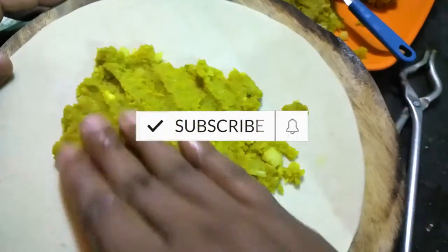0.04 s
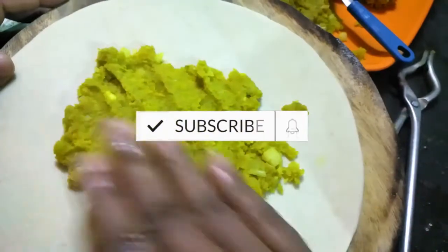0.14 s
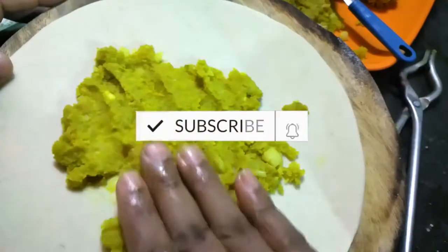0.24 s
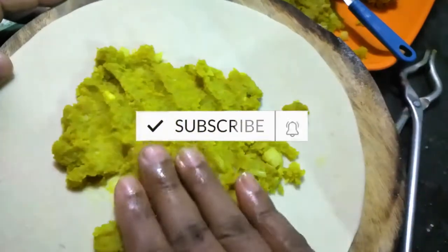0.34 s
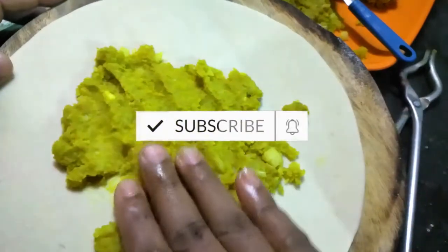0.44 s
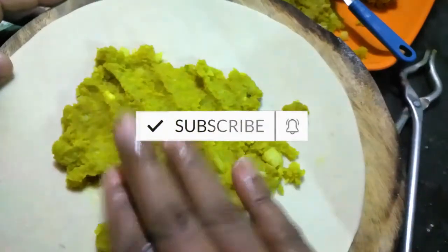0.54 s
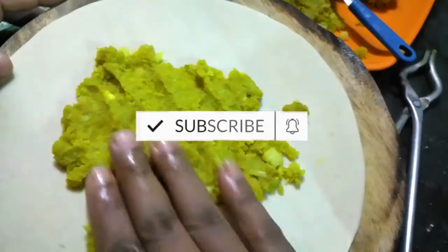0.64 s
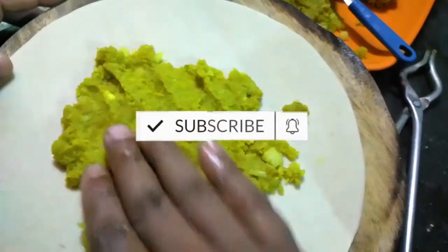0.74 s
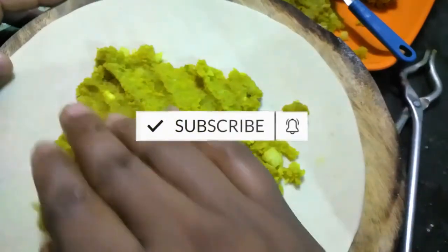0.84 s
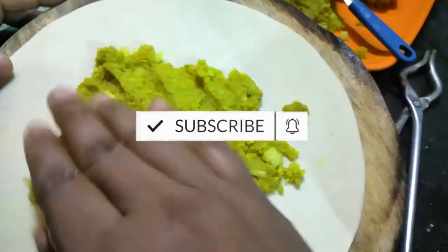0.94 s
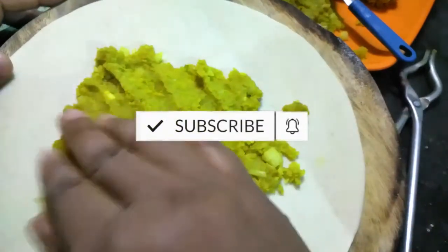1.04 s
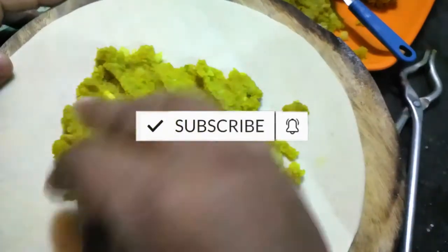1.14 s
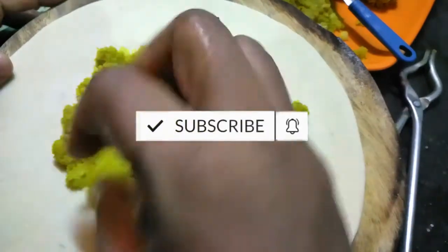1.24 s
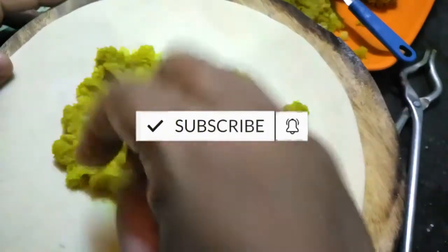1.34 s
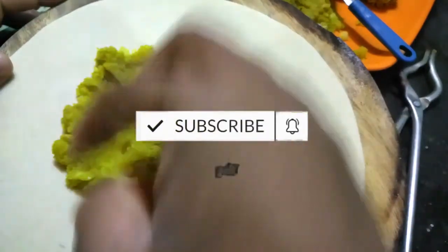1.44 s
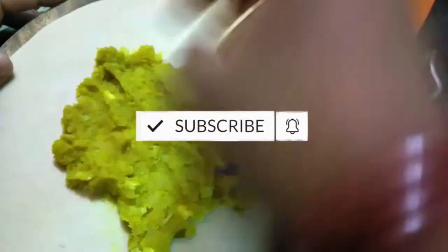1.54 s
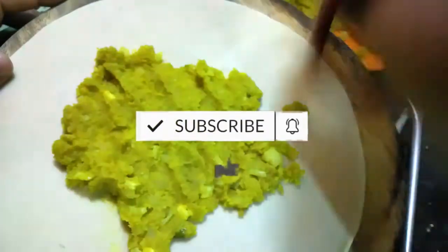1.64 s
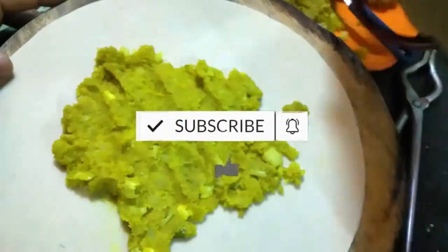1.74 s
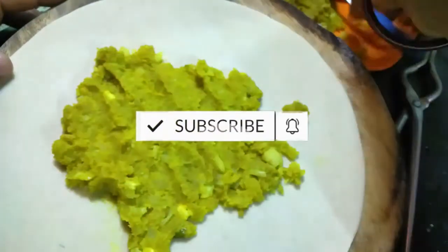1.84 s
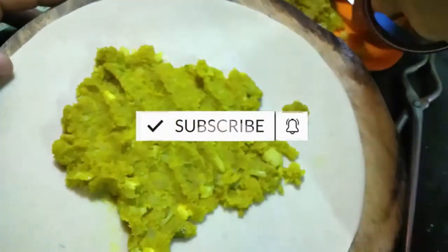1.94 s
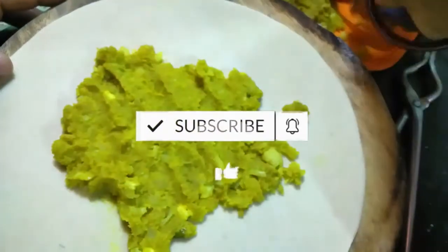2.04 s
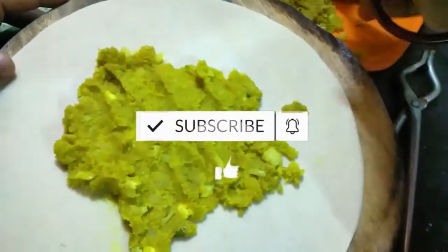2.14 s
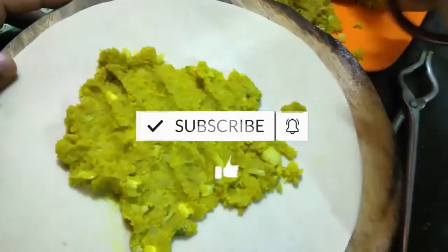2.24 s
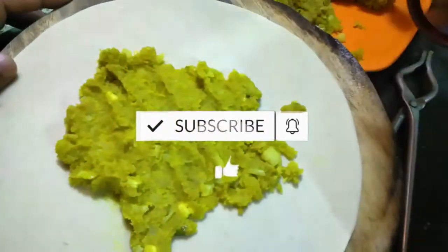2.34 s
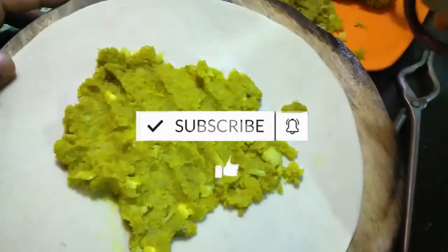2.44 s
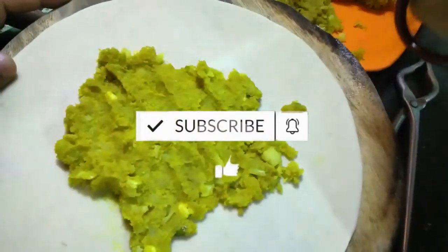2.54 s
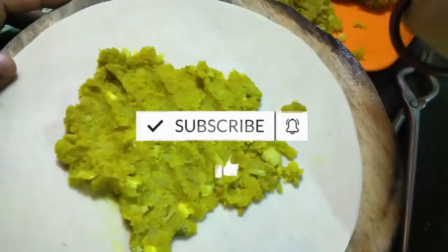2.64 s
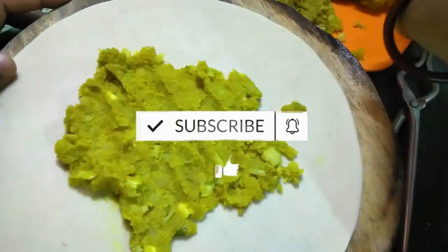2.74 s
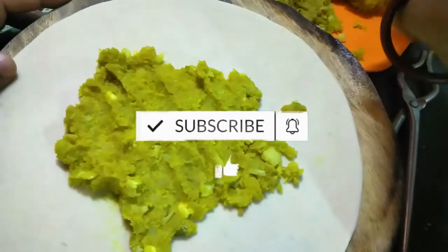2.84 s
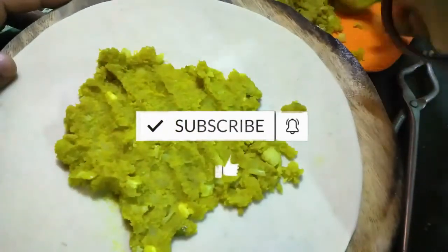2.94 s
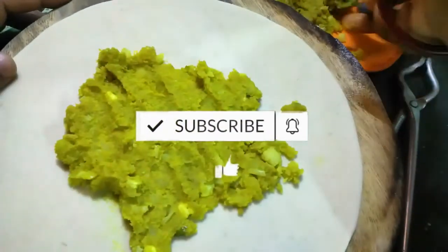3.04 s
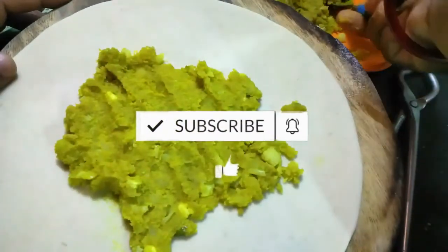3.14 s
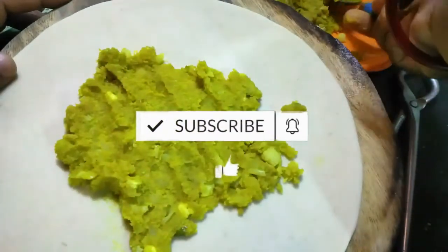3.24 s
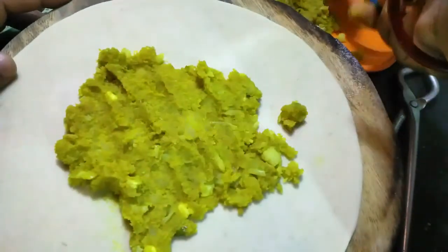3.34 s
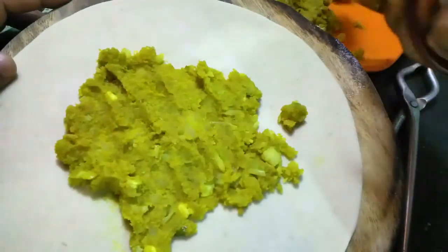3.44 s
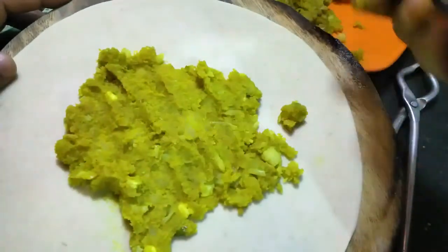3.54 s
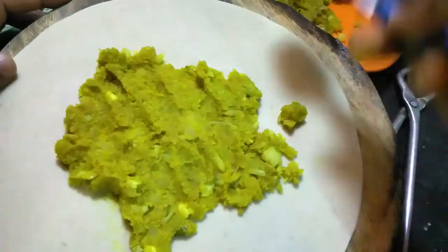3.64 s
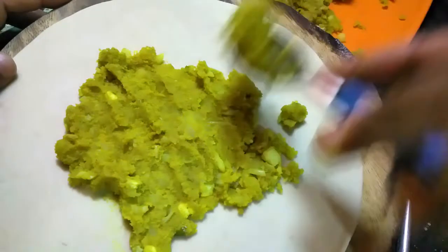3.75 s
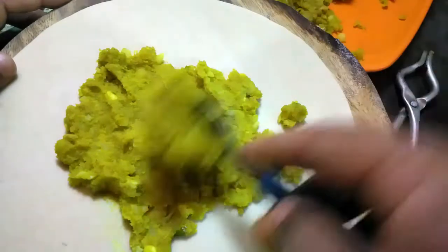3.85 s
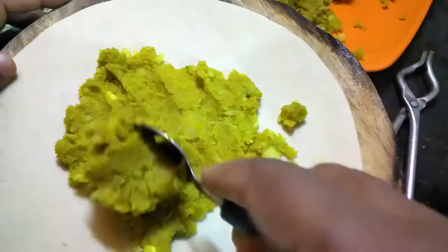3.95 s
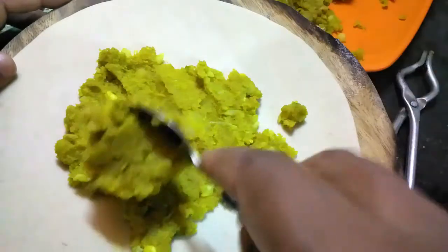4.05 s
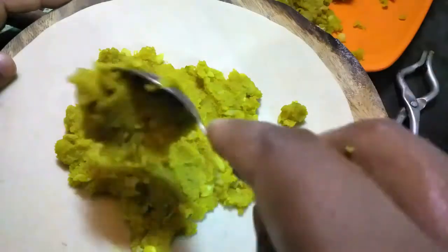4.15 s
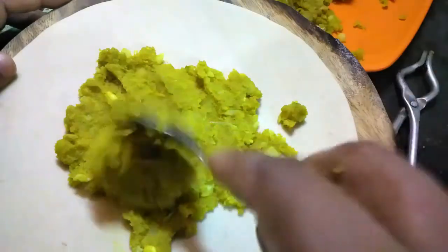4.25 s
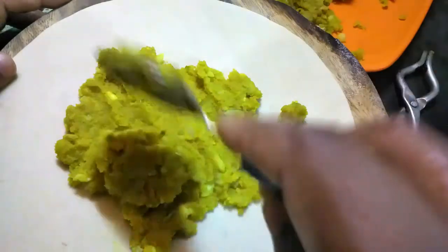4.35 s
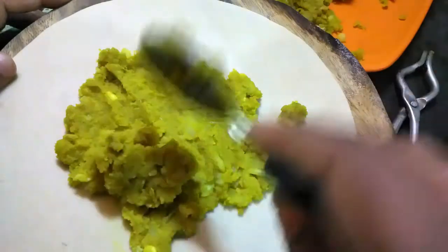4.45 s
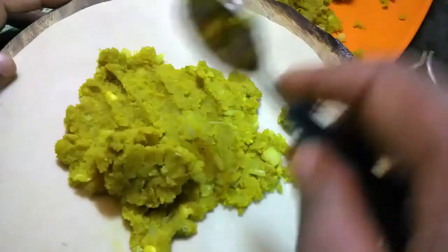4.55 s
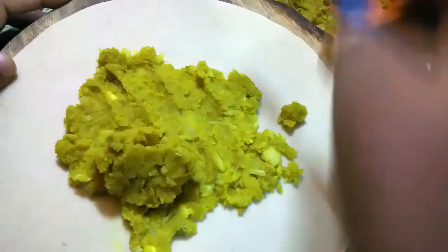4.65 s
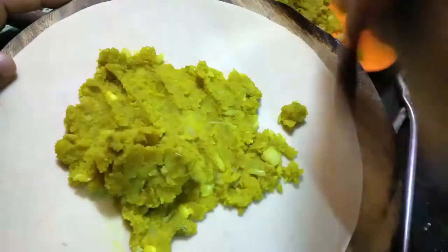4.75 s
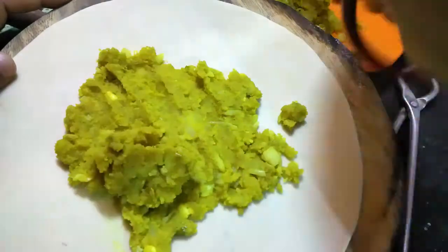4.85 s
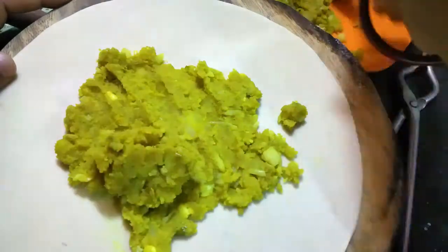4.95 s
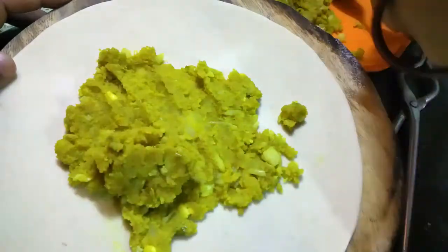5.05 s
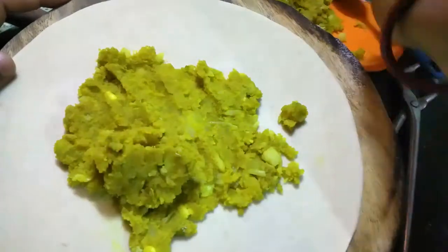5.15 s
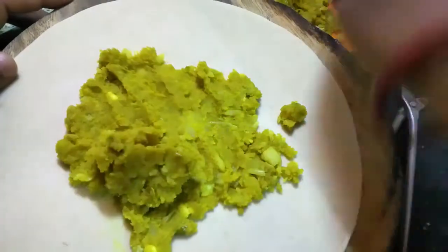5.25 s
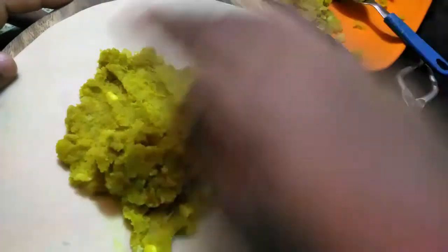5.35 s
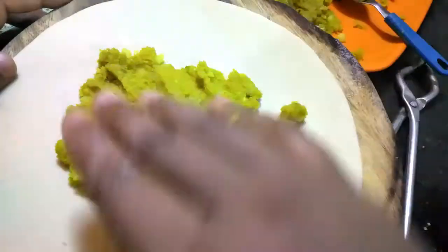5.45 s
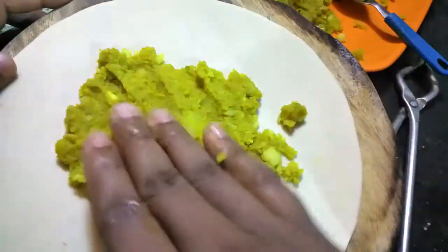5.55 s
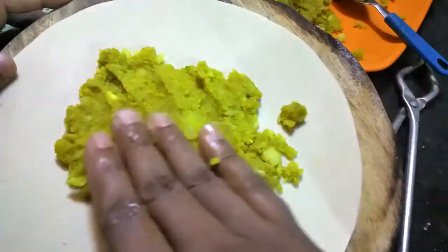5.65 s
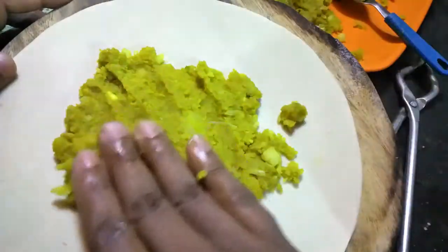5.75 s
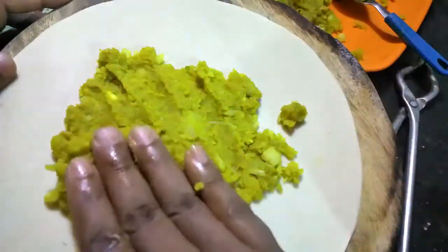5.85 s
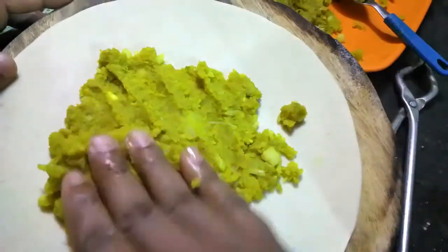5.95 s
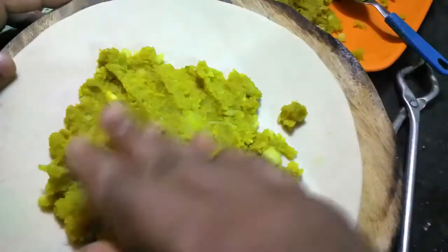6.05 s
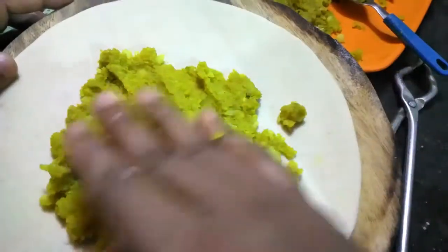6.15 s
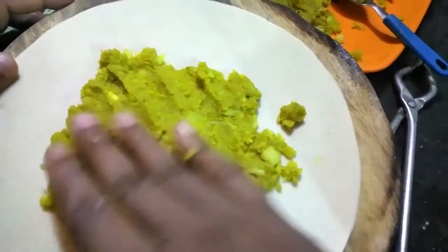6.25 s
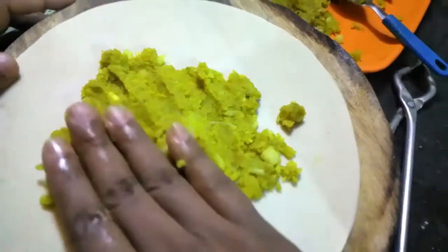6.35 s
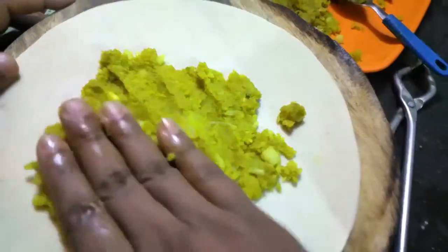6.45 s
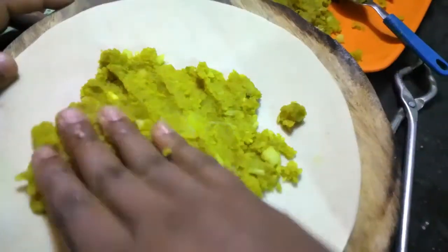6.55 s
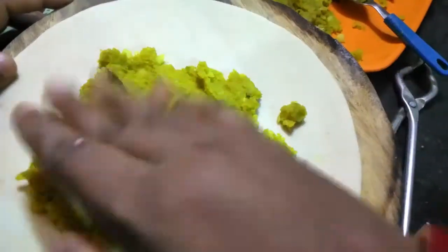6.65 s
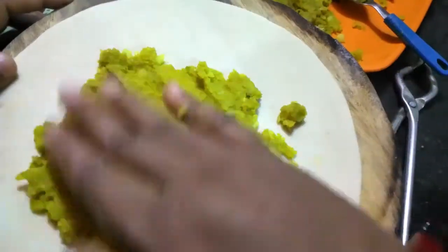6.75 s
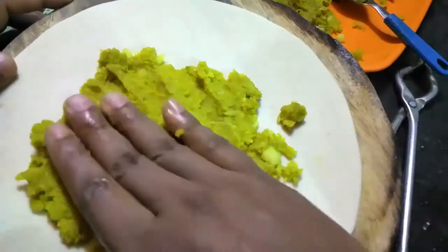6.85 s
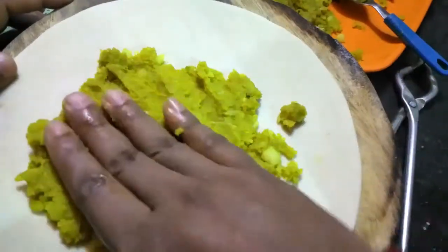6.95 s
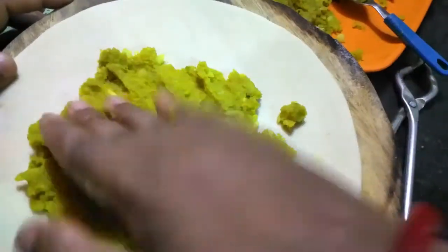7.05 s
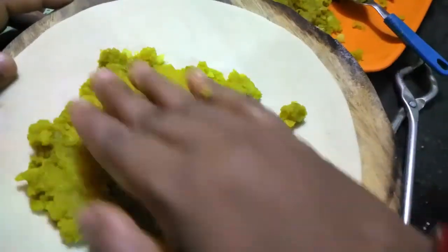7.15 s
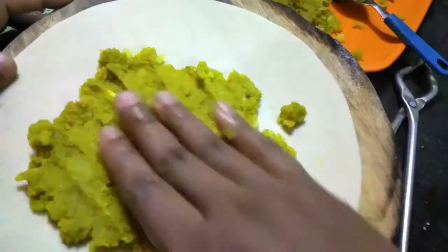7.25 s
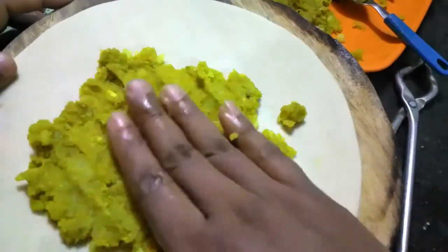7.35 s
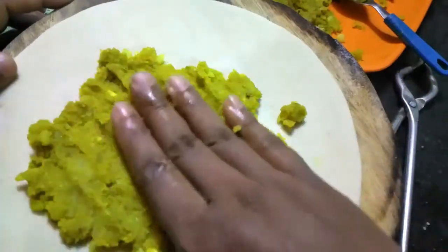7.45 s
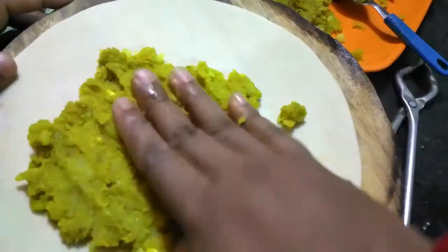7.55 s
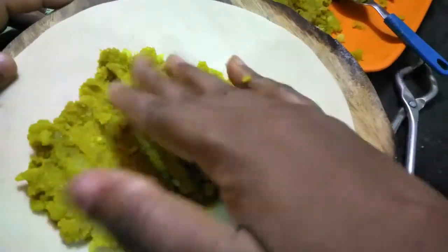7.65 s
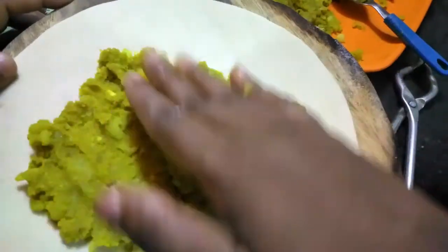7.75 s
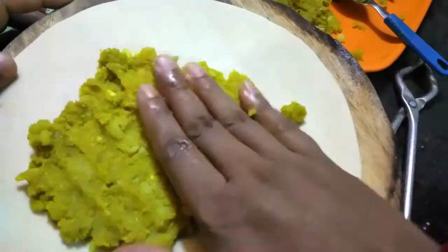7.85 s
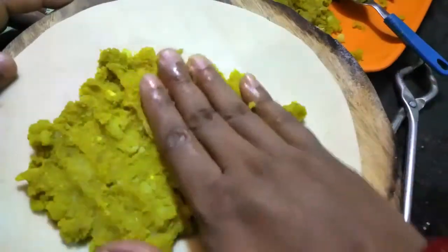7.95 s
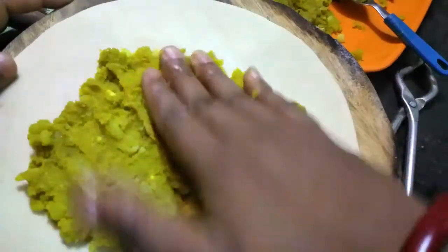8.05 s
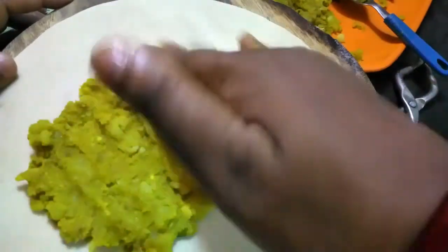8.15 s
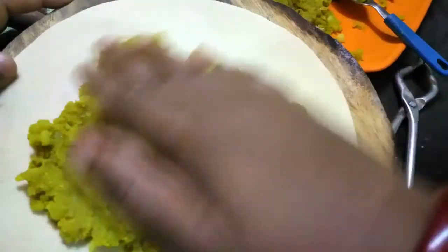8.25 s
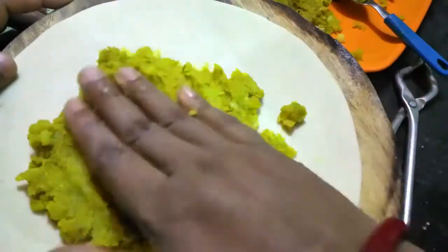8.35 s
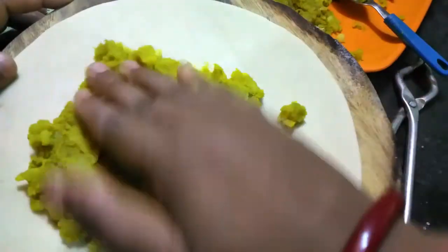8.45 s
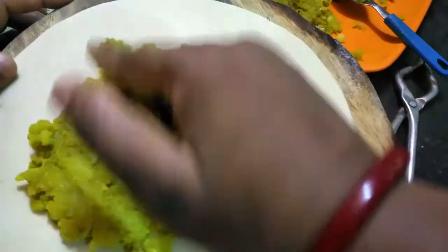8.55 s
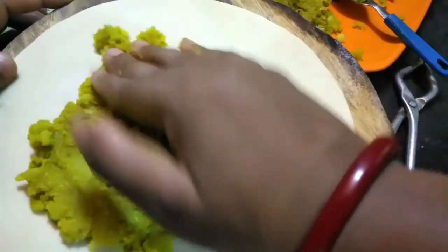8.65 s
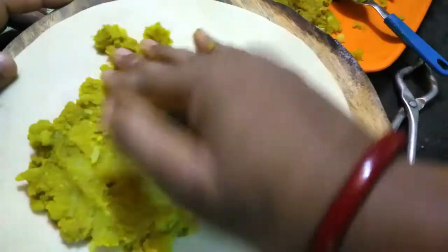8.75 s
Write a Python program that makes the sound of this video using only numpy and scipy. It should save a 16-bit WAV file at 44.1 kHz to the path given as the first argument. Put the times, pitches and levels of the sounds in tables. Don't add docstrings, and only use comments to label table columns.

```python
import sys
import numpy as np
from scipy import signal
from scipy.fft import rfft, irfft
from scipy.io import wavfile
from scipy.ndimage import uniform_filter1d

SR = 44100
rng = np.random.default_rng(int(sys.argv[2]) if len(sys.argv) > 2 else 0)


def decibels_to_gain(level_db):
    exponent = np.asarray(level_db, float) / 20
    return 10 ** exponent


def materialize(psi):
    bounded = np.clip(np.atleast_2d(psi).T, -1, 1)
    quanta = np.round(bounded * 32767).astype(np.int16)
    wavfile.write(sys.argv[1], SR, quanta)


N = 387638


def rms_one(x):
    return x / np.sqrt(np.mean(x ** 2) + 1e-20)


def drift(rate):
    r = np.exp(-80 * np.pi * rate / SR)
    noise = rng.standard_normal(N // 40 + 2002)
    slow = signal.lfilter([1], [1, -2 * r, r * r], noise)[2000:]
    return np.interp(np.arange(N) / 40, np.arange(len(slow)), rms_one(slow))


def colour(x, spectrum, size=8192):
    hz, level_db = np.transpose(spectrum)
    grid = np.maximum(np.arange(size // 2 + 1), 1) * SR / size
    cepstrum = irfft(np.log(decibels_to_gain(np.interp(np.log(grid), np.log(hz), level_db))))
    cepstrum[1:size // 2] *= 2
    cepstrum[size // 2 + 1:] = 0
    pulse = irfft(np.exp(rfft(cepstrum)))
    return signal.fftconvolve(x, pulse / np.sqrt(np.sum(pulse ** 2)))[:len(x)]


def ring(clicks, hz, t60):
    r = decibels_to_gain(-60 / (t60 * SR))
    w = 2 * np.pi * min(hz, .45 * SR) / SR
    return signal.lfilter([0, np.sin(w)], [1, -2 * r * np.cos(w), r * r], clicks + 1e-18)


def resonances(x, modes):
    total = np.zeros(N)
    for k, (hz, width, db) in enumerate(modes):
        total += (-1) ** k * decibels_to_gain(db) * np.sqrt(width) * ring(x, hz, 2.2 / width)
    return rms_one(total)


def grains(per_s, spread_db, hiss):
    sizes = decibels_to_gain(spread_db * np.minimum(rng.exponential(1, N), 4)) * rng.choice([-1, 1], N)
    born = rng.random(N) < per_s * decibels_to_gain(5 * drift(40)) / SR
    return rms_one(rms_one(sizes * born) + hiss * rng.standard_normal(N))


def struck(events, cycles, least_s):
    out = np.zeros(N)
    t = np.arange(int(.15 * SR)) / SR
    for s, peak_db, hz in events:
        life_s = cycles / hz + least_s
        onset = 1 - np.exp(-t * hz * 3)
        swing = onset * decibels_to_gain(peak_db - 60 * t / life_s) * np.sin(2 * np.pi * hz * t)
        at = round(s * SR)
        out[at:at + len(t)] += swing[:N - at]
    return out


# frequency [Hz], density [dB per Hz].
DULL_ROOM = [(10, 3), (20, -1.5), (45, -7), (70, -12), (100, -10), (130, -11), (155, -19), (200, -16),
             (300, -17), (410, -14), (600, -17), (760, -16), (1000, -18), (1500, -41)]
# frequency [Hz], density [dB per Hz].
BRIGHT_ROOM = [(700, -22), (1100, 0.5), (1600, -2), (2100, -2), (2500, -7.5), (3200, -10), (4700, -15.5),
               (5600, -14.5), (6900, -11.5), (8000, -20.5), (9500, -24.5), (13000, -27), (15600, -16.5)]
# time [s], level [dB].
BRIGHT_LEVEL = [(0, -61.5), (.3, -64), (4, -63.5), (5.5, -64.5), (6.8, -64), (7.3, -61.5), (8.79, -61.5)]
# time [s], level [dB].
MOTOR_LOAD = [(0, -70), (.24, -60.5), (1.85, -63), (2.3, -76), (2.52, -60), (2.81, -74), (3.1, -58),
              (3.5, -61), (4.04, -83), (4.89, -55.5), (5.29, -70.5), (5.48, -60), (5.73, -71), (6.8, -57.5),
              (7.02, -79), (7.3, -51.5), (7.61, -72), (7.8, -54)]
MOTOR_HZ, HUM_HZ, BEAT_HZ, WHINE_HZ = 29.3, 99.3, 1.625, 2143
DULL_DB, WHINE_DB = -54.5, -81
SWELL_START_S, SWELL_END_S, SWELL_DB, SWELL_FADE_DB_PER_S = 6.61, 7.1, 14.5, 22


def room_tone():
    t = np.arange(N) / SR
    dull = colour(rng.standard_normal(N + SR), DULL_ROOM, size=16384)[SR:]
    dull = decibels_to_gain(DULL_DB + .5 * drift(2.2)) * dull
    bright_db = np.interp(t, *np.transpose(BRIGHT_LEVEL)) + .5 * drift(3.5)
    bright = decibels_to_gain(bright_db) * colour(rng.standard_normal(N), BRIGHT_ROOM)

    motor_db = np.interp(t, *np.transpose(MOTOR_LOAD))
    motor = decibels_to_gain(motor_db) * np.sin(2 * np.pi * np.cumsum(MOTOR_HZ + 0.57 * drift(1.85)) / SR)
    beat = .55 + .45 * np.cos(2 * np.pi * BEAT_HZ * (t - 4.29))
    hum = decibels_to_gain(-59.0 + 1.24 * drift(0.41)) * beat * np.sin(2 * np.pi * HUM_HZ * t)

    swelling = uniform_filter1d(1. * (t > SWELL_START_S) * (t < SWELL_END_S), size=2000)
    whine_db = WHINE_DB + (SWELL_DB - SWELL_FADE_DB_PER_S * (t - SWELL_START_S)) * swelling
    whine_phase = 2 * np.pi * np.cumsum(WHINE_HZ + 6 * drift(7.0)) / SR
    whine = decibels_to_gain(whine_db + 4.1 * drift(8)) * np.sin(whine_phase)
    return dull + bright + motor + hum + whine


NEAR_T60_S, KITCHEN_T60_S = 0.089, 0.39


def kitchen(x):
    t = np.arange(int(.6 * SR)) / SR
    fall = decibels_to_gain(-60 * t / NEAR_T60_S) + decibels_to_gain(-13.0 - 60 * t / KITCHEN_T60_S)
    build_up = 1 - np.exp(-t / 0.0043)
    tail = rng.standard_normal(len(t)) * fall * build_up
    dull = signal.lfilter(*signal.butter(2, 8500, fs=SR), tail)
    tail = dull + (tail - dull) * decibels_to_gain(-60 * t / .5)
    return signal.fftconvolve(x, tail / np.sqrt(np.sum(tail ** 2)))[:N]


# start [s], peak [dB], pitch [Hz].
BUMPS_AND_RINGS = [(.212, -42.5, 86), (.586, -34.5, 90), (1.88, -36, 6050), (1.9, -50, 85), (2.48, -40, 238),
                   (2.78, -41, 543), (4.22, -42, 180), (5.025, -43, 200), (5.122, -41, 266), (2.841, -34, 930),
                   (5.128, -41, 85), (5.7, -46, 256), (6.5, -52, 447), (7.487, -39, 125), (8.72, -41, 81.5)]


def bumping():
    return decibels_to_gain(-2.5) * struck(BUMPS_AND_RINGS, cycles=6.6, least_s=0.02)


def in_time(tables):
    rows = []
    for table in tables:
        if rows and table[0][0] - rows[-1][0] > .015:
            rows += [(rows[-1][0] + .004, -110, *rows[-1][2:])]
            rows += [(table[0][0] - .004, -110, *table[0][2:])]
        rows += table
    before = (rows[0][0] - .004, -110, *rows[0][2:])
    after = (rows[-1][0] + .004, -110, *rows[-1][2:])
    s, *columns = np.transpose([before, *rows, after])
    return [np.interp(np.arange(N) / SR, np.maximum.accumulate(s), c) for c in columns]


# time [s], dish ring [dB], blade ring [Hz].
DRAGS = [
    [(1.868, -84, 3000), (1.877, -57, 3000), (1.884, -35, 2580), (1.893, -44, 2020), (1.905, -46, 1830),
     (1.93, -51.5, 1810), (1.94, -67, 1810), (1.964, -62, 1810), (1.99, -78, 1810)],
    [(2.846, -72, 2520), (2.86, -66, 2480), (2.894, -60, 2400), (2.94, -61.5, 2250), (2.968, -42, 2010),
     (3.0, -39, 1900), (3.036, -41.5, 1810), (3.052, -56, 1800), (3.12, -74, 1900)],
    [(3.158, -80, 2650), (3.17, -65, 2650), (3.236, -67, 2650), (3.27, -77, 2650)],
]
# from time [s], hollow body [dB], rasp [dB], top hiss [dB].
DRAG_SHADES = [(0, -5.5, -15, -27), (2.4, -8.5, 2.5, -4.5), (3.14, -9.5, -4, -2.5)]
# frequency [Hz], width [Hz], level [dB].
DISH_MODES = [(2400, 180, -3), (2900, 60, 1), (3380, 250, -9), (4100, 170, -3)]
# frequency [Hz], width [Hz], level [dB].
HOLLOW_MODES = [(790, 23, -14.5), (982, 130, -15), (1170, 110, -11.5)]
# frequency [Hz], density [dB per Hz].
RASP_SPECTRUM = [(3400, -20), (4300, -2), (4900, -4), (5600, -2.5), (6100, 0.5), (6500, -3), (7000, 1.5),
                 (7800, -7), (9000, -16), (11500, -45)]
# frequency [Hz], density [dB per Hz].
HISS_SPECTRUM = [(5000, -28), (8500, -14), (9150, -3.5), (12300, 1), (13400, -4), (14900, 7), (15900, -2)]
HOLLOW_LAG, RASP_LAG, HISS_LAG = 0.33, 0.16, .03


def scraping():
    ring_db, blade_hz = in_time(DRAGS)
    start, hollow_db, rasp_db, hiss_db = np.transpose(DRAG_SHADES)
    drag = np.searchsorted(start[1:], np.arange(N) / SR)
    excess_db = np.clip(ring_db + 50, -20, 20)
    hollow_db = hollow_db[drag] - HOLLOW_LAG * excess_db
    rasp_db = rasp_db[drag] - RASP_LAG * excess_db
    hiss_db = hiss_db[drag] - HISS_LAG * excess_db

    stutter = grains(per_s=1500, spread_db=3.0, hiss=0.95)
    turning = np.exp(2j * np.pi * np.cumsum(blade_hz) / SR)
    blade = np.real(turning * signal.lfilter(*signal.butter(1, 100, fs=SR), stutter / turning))
    body = decibels_to_gain(-0.5) * rms_one(blade) + decibels_to_gain(-7.0) * resonances(stutter, DISH_MODES)
    body = body + decibels_to_gain(hollow_db - .5) * resonances(stutter, HOLLOW_MODES)
    rasp = decibels_to_gain(rasp_db - 1.0) * colour(stutter, RASP_SPECTRUM)
    hiss = decibels_to_gain(hiss_db + 1.5) * colour(stutter, HISS_SPECTRUM)
    return decibels_to_gain(ring_db) * (body + rasp + hiss)


# start [s], peak [dB], share sent to the walls [0-1].
TOUCHES = [
    (2.8405, -36, 1),
    (3.176, -47, .5),
    (4.088, -48, 1),
    (5.1203, -0.5, 0.81),
    (5.1225, -11, 0),
    (5.1244, -13, 0.15),
    (5.126, -24, 0.2),
    (5.1387, -17.5, 0.2),
]
# frequency [Hz], density [dB per Hz].
CRACK_SPECTRUM = [(120, -42), (200, -35), (1340, -15), (2160, 7.5), (2840, -6), (3350, -2), (5200, -17.5),
                  (6850, -13), (7640, -18.5), (15100, -16), (15900, -41)]
# frequency [Hz], level [dB], t60 [s].
CLACK_MODES = [(2285, -6, 0.025), (6800, -5, 0.014), (1920, -6.5, .025), (3325, -9.5, 0.021),
               (1018, -31, 0.038), (5890, -8, .01)]
# frequency [Hz], level [dB], t60 [s].
SPOON_MODES = [(1090, -19, 0.094), (1780, -12, 0.17), (2040, -8, 0.33), (2310, -10, 0.41),
               (2760, -28, 0.31), (3780, -15, 0.15), (4170, -4, 0.107), (4240, -9.5, 0.13),
               (5200, -15.5, 0.24), (7050, -12, 0.29)]
# frequency [Hz], density [dB per Hz].
WALL_SPECTRUM = [(120, -46.5), (200, -17.5), (273, -10), (305, -23.5), (359, -16), (500, -24), (657, -6.5),
                 (1140, -4), (1320, -12), (2370, -4.5), (3060, -14), (6720, -9), (8530, -19.5),
                 (15900, -30.5)]


def tapping():
    s, peak_db, sent = np.transpose(TOUCHES)
    at = np.round(s * SR).astype(int)
    clicks, to_walls = np.zeros(N), np.zeros(N)
    clicks[at] = decibels_to_gain(peak_db) * (-1) ** np.arange(1, len(at) + 1)
    to_walls[at] = clicks[at] * np.clip(sent, 0, 1)

    softened = signal.lfilter([.55], [1, -.45], clicks)
    blows = decibels_to_gain(4.5) * colour(softened, CRACK_SPECTRUM)
    for k, (hz, db, t60) in enumerate(CLACK_MODES):
        blows += decibels_to_gain(-2.5) * (-1) ** k * decibels_to_gain(db) * ring(clicks, hz, t60)
    for hz, db, t60 in SPOON_MODES:
        blows += decibels_to_gain(-22.0) * decibels_to_gain(db) * ring(to_walls, hz, 0.74 * t60)
    return blows, decibels_to_gain(9) * colour(to_walls, WALL_SPECTRUM)


# full pressure at [s], held for [s], level near 7 kHz [dB], top octave against it [dB].
FINGER_STROKES = [(0.01, 0.045, -58, -6), (0.084, 0.011, -55, -0.5), (.23, 0.078, -67.5, -6),
                  (.42, 0.022, -67, -2), (.462, 0.0034, -57, 3.5), (.505, .004, -63.5, 0),
                  (.715, .02, -59.5, 0), (1.095, 0.046, -74, 7), (4.078, .002, -80, 10),
                  (4.272, .04, -70, -2), (5.68, .3, -74.5, 2), (5.875, .002, -63, -4),
                  (6.01, 0.048, -58.5, 3), (6.392, .01, -62, -5), (6.44, 0.0086, -64, -3),
                  (6.515, 0.045, -59.5, -1), (6.58, 0.049, -60.5, 2), (2.79, .04, -72, -2),
                  (6.9, 0.089, -76, -3), (7.04, 0.066, -59.5, 2), (7.422, 0.023, -70, 9),
                  (7.55, 0.024, -70, 5), (7.6, 0.041, -53, 0), (7.94, 0.03, -66, -2),
                  (8.03, 0.034, -53.5, -0.5), (8.07, 0.054, -57, -2), (8.165, .004, -61, -1),
                  (8.43, 0.14, -65, 2.5), (8.58, 0.08, -64, -0.5), (8.785, .004, -67, 2)]
PRESS_DB_PER_S, LIFT_DB_PER_S = 900, 450


def strokes():
    t = np.arange(0, N + 32, 32)[:, None] / SR
    s, held, level_db, top_against_db = np.transpose(FINGER_STROKES)
    press_db = PRESS_DB_PER_S * np.maximum(s - t, 0)
    lift_db = LIFT_DB_PER_S * np.maximum(t - s - held, 0)
    low_db = level_db - press_db - lift_db
    strongest = [np.maximum(db.max(axis=1), -120) for db in (low_db, low_db + top_against_db)]
    return [np.interp(np.arange(N) / SR, t[:, 0], db) for db in strongest]


# start [s], peak [dB].
LARGE_POCKETS = [(0.0118, -43), (0.0278, -33), (0.0515, -41), (0.2714, -38), (0.2931, -45), (0.4971, -34),
                 (0.7181, -40), (2.9599, -38), (2.9725, -28), (2.9828, -32), (3.0199, -37), (4.2962, -36.5),
                 (5.777, -43), (5.874, -38.5), (6.009, -34.5), (6.398, -45), (6.51, -43), (7.3522, -49),
                 (7.5896, -40), (7.6134, -27), (8.0294, -28), (8.049, -29), (8.107, -41), (8.4237, -39),
                 (8.467, -40), (8.523, -38), (8.5949, -37), (8.6228, -41)]
# start [s], peak [dB].
SMALL_POCKETS = [(0.4597, -36), (0.5104, -43), (1.1378, -38), (4.0791, -31.5), (5.895, -41), (5.98, -46),
                 (6.0274, -34), (6.0346, -22.5), (6.3773, -49.5), (6.62, -43), (7.0265, -28.5),
                 (7.4104, -51), (7.4165, -43), (7.4254, -47), (7.451, -47), (7.5383, -49), (7.566, -41),
                 (7.605, -22), (7.6327, -34), (7.9513, -44), (8.4432, -47), (8.465, -26), (8.5135, -30),
                 (8.64, -41)]
LARGE_HZ, LARGE_SPREAD, SMALL_HZ, SMALL_SPREAD = 6600, 0.052, 15300, .025


def snaps():
    rows = []
    for table, hz, spread in ((LARGE_POCKETS, LARGE_HZ, LARGE_SPREAD), (SMALL_POCKETS, SMALL_HZ, SMALL_SPREAD)):
        rows += [(s, db, hz * (1 + spread * rng.uniform(-0.92, 1))) for s, db in table]
    return rows


def pockets(tearing, low_hz, high_hz, cycles, count=8):
    dealt = rng.integers(0, count, N // 64 + 1).repeat(64)[:N]
    total = np.zeros(N)
    for k, hz in enumerate(np.geomspace(low_hz, high_hz, count)):
        total += ring(tearing * (dealt == k), hz, cycles / hz) * np.sqrt(hz)
    return rms_one(total)


# frequency [Hz], density [dB per Hz].
LARGE_SPECTRUM = [(1470, -36), (2500, -7), (3480, -12.5), (3800, -10), (4190, -15), (6980, 2), (8800, -10),
                  (10000, -15.5), (13000, -34), (22000, -120)]
# frequency [Hz], density [dB per Hz].
SMALL_SPECTRUM = [(5290, -40.5), (9000, -13), (10300, -8.5), (13000, -5.5), (15100, 3), (16000, -12)]
OTHER_SIZE_DB = 6


def fingers():
    low_db, top_db = strokes()
    popped = snaps()
    shared = grains(700, 4.8, hiss=.55)
    large = pockets(shared + .6 * grains(900, 5, hiss=1), 3500, 10000, cycles=4)
    small = pockets(shared + .6 * grains(900, 5, hiss=1), 9000, 16000, cycles=4)
    low = decibels_to_gain(low_db + 0.75) * rms_one(colour(large, LARGE_SPECTRUM))
    top = decibels_to_gain(top_db + 1.5) * rms_one(colour(small, SMALL_SPECTRUM))

    s, db, hz = np.transpose(popped)
    at, big = np.round(s * SR).astype(int), hz < 10000
    low_clicks, top_clicks = np.zeros(N), np.zeros(N)
    low_clicks[at] = decibels_to_gain(db - np.where(big, 0, OTHER_SIZE_DB))
    top_clicks[at] = decibels_to_gain(db - np.where(big, OTHER_SIZE_DB, 0))
    broad = decibels_to_gain(-5.0) * colour(low_clicks, LARGE_SPECTRUM) + decibels_to_gain(0.5) * colour(top_clicks, SMALL_SPECTRUM)
    return low + top + broad + decibels_to_gain(-3) * struck(popped, cycles=10, least_s=.0004)


def scene():
    hand, scrape = fingers(), scraping()
    blows, to_walls = tapping()
    echo = kitchen(decibels_to_gain(-11.5) * hand + decibels_to_gain(-9) * scrape + to_walls)
    return (room_tone() + bumping() + echo + scrape + blows + hand)[None]


def roll_off(x):
    return signal.sosfilt(signal.butter(12, 16980, fs=SR, output="sos"), x)


def record(dry):
    rounded = .9 * np.tanh(dry / .9)
    mix = signal.sosfilt(signal.cheby2(16, 60, 16150, fs=SR, output="sos"), rounded)
    return roll_off(mix)


dry = scene()
out = record(dry)
materialize(out)
```